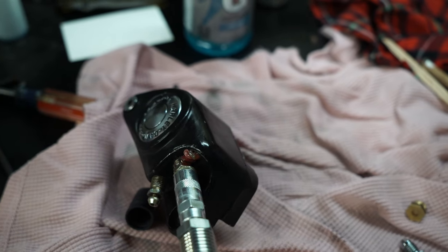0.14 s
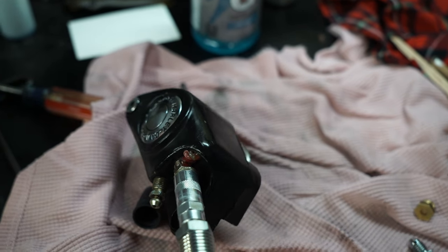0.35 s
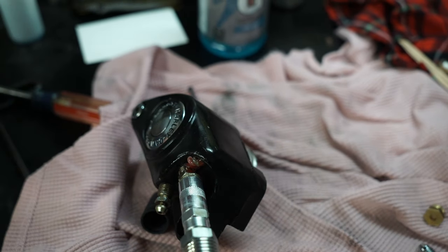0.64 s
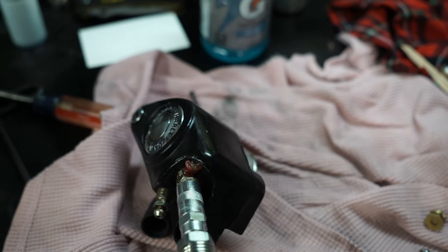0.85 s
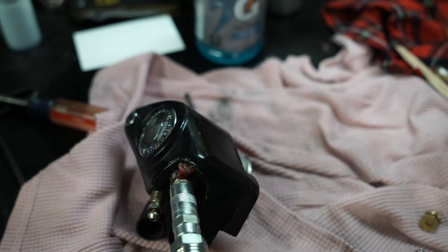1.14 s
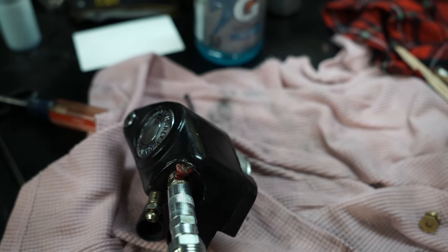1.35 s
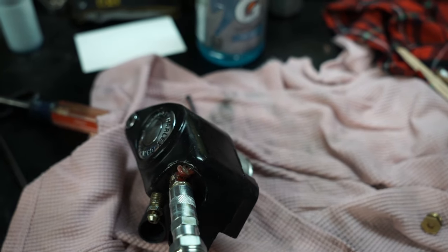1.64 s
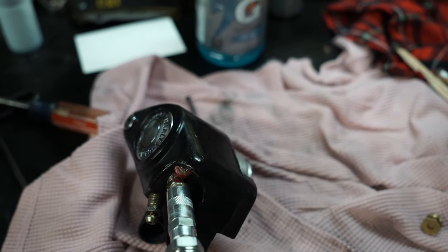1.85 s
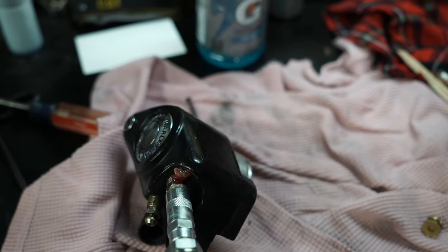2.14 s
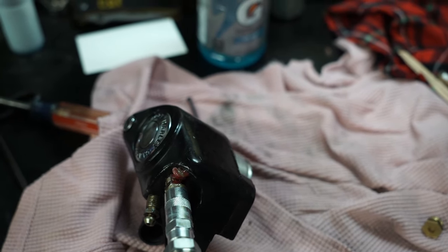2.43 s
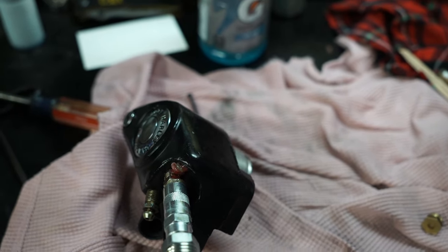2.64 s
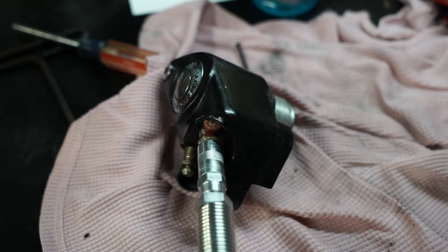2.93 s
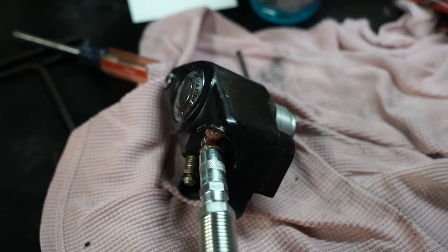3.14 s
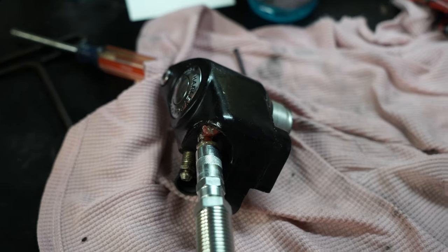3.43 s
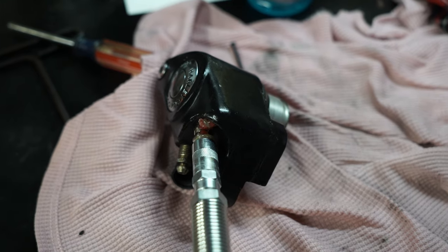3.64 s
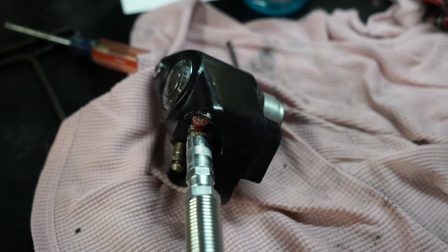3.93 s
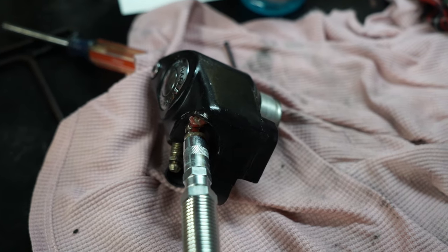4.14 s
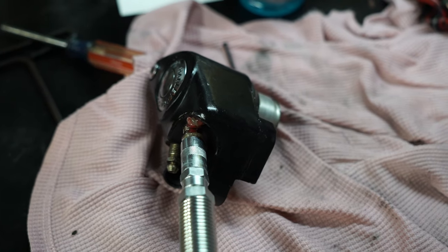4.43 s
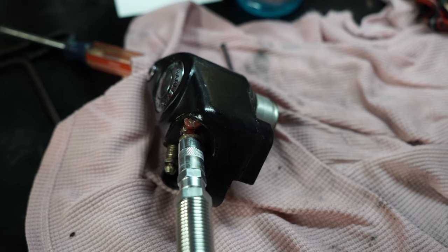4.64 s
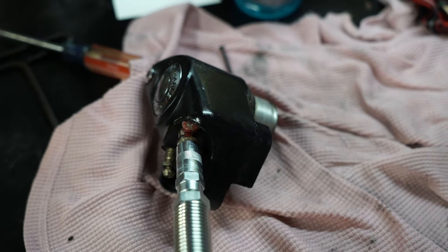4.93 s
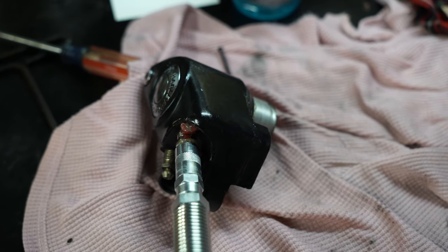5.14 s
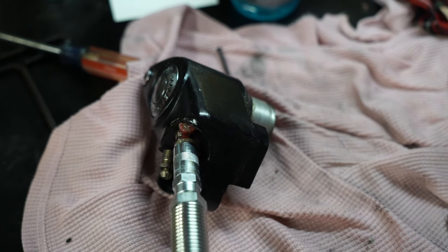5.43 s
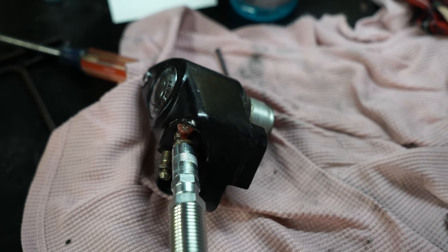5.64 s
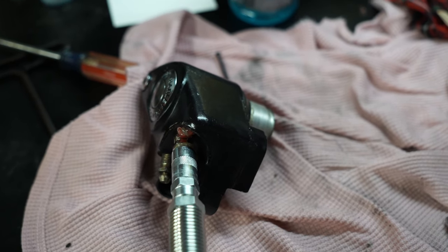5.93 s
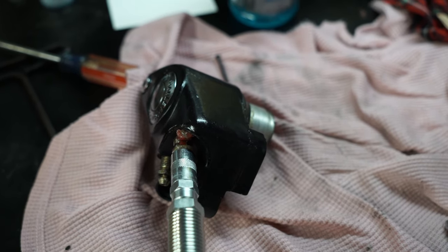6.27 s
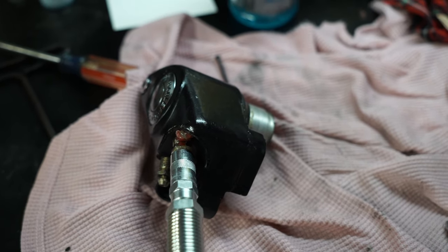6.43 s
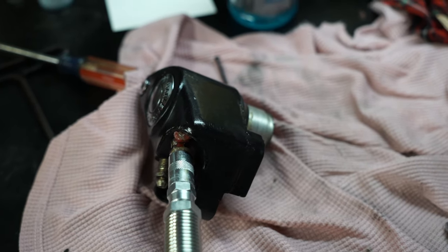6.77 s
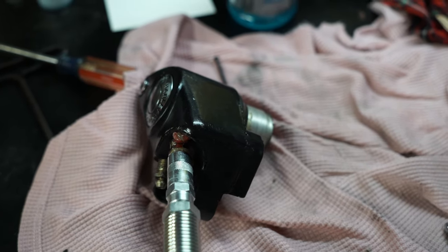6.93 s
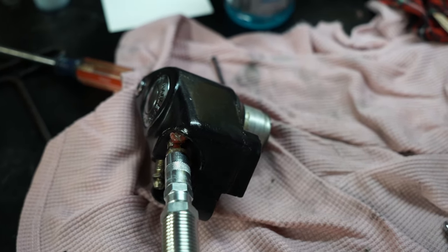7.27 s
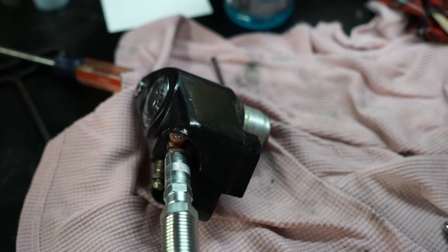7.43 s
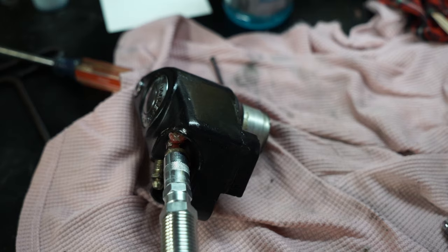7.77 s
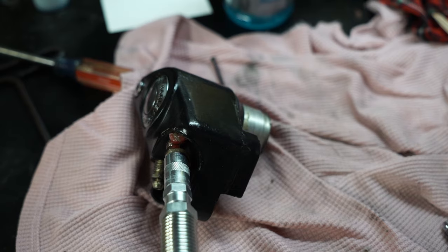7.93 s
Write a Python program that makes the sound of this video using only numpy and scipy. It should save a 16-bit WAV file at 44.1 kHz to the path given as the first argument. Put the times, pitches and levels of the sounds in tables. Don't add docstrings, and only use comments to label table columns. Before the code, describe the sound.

Close, bright stereo sound of a motorised grease pump on a bench. Loose gear clatter tightens into brief, harsh, sagging grinds at nearly half-second intervals, each released with a small knock, over an unchanging piercing tone. After nearly three seconds it stops for about half a second, with soft hum, trigger ticks and distant birds. A sharp click and jolt bring it back, revving up and pulsing steadily until the end.

```python
import sys
import numpy as np
from scipy import signal
from scipy.fft import rfft, irfft
from scipy.io import wavfile
from scipy.ndimage import uniform_filter1d

SR = 44100
rng = np.random.default_rng(int(sys.argv[2]) if len(sys.argv) > 2 else 0)


def wav_out(sig):
    wavfile.write(sys.argv[1], SR, np.round(np.clip(np.atleast_2d(sig).T, -1, 1) * 32767).astype(np.int16))


def gain_from_db(level_db):
    decades = np.asarray(level_db, float) / 20
    return 10 ** decades


N = 357210
T = np.arange(N) / SR
HZ = np.fft.rfftfreq(N, 1 / SR)
START_S = 3.274


def evened(x):
    return x / np.sqrt(np.mean(x ** 2) + 1e-20)


def read(points):
    f, value = np.transpose(points)
    return np.interp(np.log(HZ + 1), np.log(f + 1), value)


def over_time(points):
    return np.interp(T, *np.transpose(points))


def curve(tables, column, rest):
    out = np.full(N, float(rest))
    for rows in map(np.array, tables):
        inside = (T >= rows[0, 0]) & (T <= rows[-1, 0])
        out = np.where(inside, np.interp(T, rows[:, 0], rows[:, column]), out)
    return out


def wander(hz):
    steps = T[::30]
    lowpass = np.exp(-(np.fft.rfftfreq(len(steps), steps[1]) / hz) ** 2)
    slow = rfft(rng.standard_normal(len(steps))) * lowpass
    return np.interp(T, steps, evened(irfft(slow, len(steps))))


def room_hum(share):
    # (frequency [Hz], level [dB])
    room = [(18, -37), (30, -17.5), (75, -10), (124, -17), (165, -12.5), (355, -9.5), (499, -16),
            (616, -16), (913, -19.5), (6380, -27.5), (16000, -33)]
    noise = rfft(rng.standard_normal((3, N)))
    pair = np.sqrt(share) * noise[0] + np.sqrt(1 - share) * noise[1:]
    return evened(irfft(pair * gain_from_db(read(room)), N))


def birds():
    # (time [s], pitch [Hz], level [dB])
    phrases = [
        [(2.94, 6500, -80), (3.0, 6500, -68), (3.07, 6850, -66), (3.12, 6600, -74), (3.2, 6200, -76)],
        [(3.02, 3390, -75), (3.045, 3350, -59), (3.07, 3370, -67)],
        [(3.18, 4800, -79), (3.21, 4450, -68), (3.24, 4150, -74)],
    ]
    out = np.zeros(N)
    for rows in phrases:
        pitch = curve([rows], 1, 0) * (1 + .012 * wander(200))
        level_db = curve([rows], 2, -140) + 2.7 * wander(40)
        out += gain_from_db(level_db) * np.sin(2 * np.pi * np.cumsum(pitch) / SR)
    return out


def ticks():
    # (time [s], level [dB], centre [Hz], half width [Hz])
    tick_table = [
        (3.061, -51, 1200, 350),
        (3.0935, -50, 1400, 600),
        (3.0945, -52, 3200, 1500),
        (3.092, -45, 6900, 1900),
        (3.0935, -54, 12400, 3300),
        (3.269, -40, 2500, 1500),
        (3.269, -46, 5500, 3900),
        (3.312, -41, 420, 120),
        (3.33, -33.5, 742, 92.3),
    ]
    out, after = np.zeros(N), T[:8000]
    for s, db, hz, width in tick_table:
        shape = np.exp(-((np.fft.rfftfreq(len(after), 1 / SR) - hz) / width) ** 4)
        band = evened(irfft(rfft(rng.standard_normal(len(after))) * shape))
        ring = np.clip(after / 0.00089, 0, 1) * np.exp(-8 * np.sqrt(width) * after / 2)
        out[round(s * SR):][:len(after)] += gain_from_db(db) * band * ring
    return out


def trigger():
    stop_s, coast_db_per_s, ring_db, ring_db_per_s = 2.7, 420, -33, 133
    catch_s, catch_db = 0.076, -54
    surge_db, surge_s = 0.5, 2.2
    off, on = np.maximum(T - stop_s, 0), T - START_S
    catching_db = catch_db * np.clip(1 - on / catch_s, 0, 1) ** 2
    starting_db = catching_db + surge_db * np.exp(-abs(on) / surge_s)
    coasting_db = np.maximum(-coast_db_per_s * off, -120)
    ring = np.minimum(off / 0.014, 1) * gain_from_db(ring_db - ring_db_per_s * off)
    return np.where(on > 0, starting_db, coasting_db), ring


def shop_ring(ring):
    # (frequency [Hz], level [dB])
    shop = [(290, -40), (500, -8), (575, -8), (838, -7), (1380, -6), (1570, 1), (2740, -9), (4050, -4.5),
            (14000, -33)]
    spectrum = rfft(rng.standard_normal((3, N))) * gain_from_db(read(shop)) * (HZ > 400)
    return ring * evened(irfft(spectrum, N))


def whine(load):
    # (time [s], level [dB], left minus right [dB])
    whine_runs = [
        [(0.0, -34.5, -5.5), (0.6, -33, -7.5), (1.7, -33.5, -6.5), (2.61, -32.5, -7), (2.72, -52, -1)],
        [(3.268, -45, -3), (3.285, -36, -7), (3.33, -28, -21), (3.4, -28, -17), (3.48, -28.5, -38),
         (4.13, -33.5, -30), (4.55, -35, -23), (5.01, -34.5, -24), (5.48, -35, -17), (6.12, -35.5, -11.5),
         (7.44, -35, -16), (8.1, -35, -13)],
    ]
    # (time [s], frequency [Hz])
    switching = [(0, 3909.6), (2.7, 3909.6), (3.3, 3907.4), (8.1, 3906.6)]
    # (multiple of the tone [1], level [dB])
    overtones = [(2, -67), (3, -55), (4, -58)]
    turns = 2 * np.pi * np.cumsum(over_time(switching)) / SR
    dip_db = -2 * load
    level_db = curve(whine_runs, 1, -120) + 16.5 + dip_db + .7 * wander(40)
    gain = uniform_filter1d(gain_from_db(level_db), 150)
    narrow = (T > 3.275) * gain_from_db(-25 * np.maximum(T - 3.33, 0))
    upper = narrow * sum(gain_from_db(db) * np.sin(k * turns) for k, db in overtones)
    left = gain_from_db(curve(whine_runs, 2, 0)) * np.sin(turns + 2.75)
    return gain * np.array([left, np.sin(turns)]) + upper


def pump():
    # (time [s], length [s], push [dB])
    strokes = [(-.275, .15, 0), (0.21, 0.14, -2), (0.684, 0.16, -2.5), (1.158, 0.15, -1.5),
               (1.637, 0.15, -2.5), (2.114, 0.16, -2.9), (2.597, 0.089, -0.2), (3.807, 0.14, -1.5),
               (4.301, 0.14, -2.3), (4.779, .15, -2.5), (5.261, 0.14, -1.7), (5.733, 0.14, -2),
               (6.209, 0.14, -2), (6.686, 0.14, -1.5), (7.161, 0.15, -2), (7.64, 0.13, -2.5)]
    # (time [s], shaft speed [Hz])
    spin_up = [(3.28, 20), (3.35, 84), (3.6, 146), (3.72, 151), (3.81, 152)]
    # (time [s], speed factor [1])
    pace = [(0, 1.012), (2.7, 1.005), (3.81, .985), (4.3, .99), (4.78, 1), (8.1, .995)]
    # (time since stroke [s], level [dB])
    play = [(0, 2), (.03, -2.5), (.1, -6), (.15, -2.5), (.18, -3.5), (.22, -0.16), (.3, 1.74), (.4, -2.5),
            (.48, 1.34)]
    top_hz, low_hz = 173, 123
    sag_s, climb_s, turn_s, climb_bend = .125, .16, .48, .75
    bite_s = 0.0075
    start, length, push_db = np.transpose(strokes)
    last = np.searchsorted(start, T, "right") - 1
    since = T - start[last]
    freed = since - length[last]
    load = np.clip(since / 0.012, 0, 1) * np.clip((0.041 - freed) / 0.055, 0, 1)
    sagging = (1 + np.cos(np.pi * np.minimum(since / sag_s, 1) ** .92)) / 2
    climbing = np.clip((since - climb_s) / (turn_s - climb_s), 0, 1) ** climb_bend
    shaft = (low_hz + (top_hz - low_hz) * (sagging + climbing)) * over_time(pace)
    spinning_up = (T > 2.9) & (T < start[7])
    shaft = np.where(spinning_up, over_time(spin_up), shaft)
    bite = sum(np.exp(-((T - s) / bite_s) ** 2) for s in start)
    return freed, load, gain_from_db(push_db[last]), np.interp(since, *np.transpose(play)), bite, shaft


def housing(x, points):
    # (frequency [Hz], width [Hz], gain [dB])
    modes = [(1303, 52, 4), (1525, 66, 1.5), (1740, 296, 5), (2034, 42, 5), (2244, 80, 11),
             (2500, 141, 11.5), (3302, 64, 5.5), (3480, 31, 6.5), (3790, 30, 0.5), (4750, 120, 5.5),
             (4200, 300, 2), (5170, 440, 4), (6700, 30, 7.5), (7500, 100, 1.5), (8300, 40, 0.5),
             (9100, 120, 4), (10100, 100, -2.5)]
    ring_db = sum(db / (1 + (2 * (HZ - hz) / width) ** 2) for hz, width, db in modes)
    return irfft(rfft(x) * gain_from_db(read(points) + ring_db), N)


def grit(points, per_s, spread_db):
    hits = (rng.random((3, N)) < per_s / SR) * rng.standard_normal((3, N))
    return evened(housing(hits * gain_from_db(spread_db * wander(300)), points))


def gear_rumble(level_db, load):
    # (frequency [Hz], level [dB])
    rumble = [(50, -49), (110, -26), (200, -9), (400, 0), (560, -1), (720, 2.5), (900, -15.5),
              (1100, -24.5)]
    return gain_from_db(-42.5 - 6 * load + .65 * level_db) * grit(rumble, 3000, 0.54)


def gear_fizz(level_db, play_db):
    # (frequency [Hz], level [dB])
    fizz = [(3500, -32), (5000, -5.5), (6500, 5), (9000, 3), (12000, 2), (14000, 0), (15000, -0.5),
            (15800, 0)]
    lag_db = -5 * (T > START_S) * np.exp(-abs(T - START_S - 0.076) / 0.11)
    gain_db = -30.5 + 1.18 * level_db + lag_db + 0.66 * play_db + 1.7 * wander(4)
    return gain_from_db(gain_db) * grit(fizz, 16000, 0.77)


def gear_rattle(level_db, play_db, bite, load):
    # (frequency [Hz], level [dB])
    rattle = [(600, -18.5), (850, -2), (1000, 7), (1300, 11), (2000, 9), (2800, 10.5), (3800, 14),
              (4300, 7.5), (6000, 1), (8000, -26)]
    mesh_db = .5 * play_db + bite + load
    uneven_db = 0.73 * wander(42) + 0.26 * wander(10.7)
    return gain_from_db(-22.5 + level_db + mesh_db + uneven_db) * grit(rattle, 9000, 1.02)


def gear_grind(freed, load, push, running):
    # (frequency [Hz], level [dB])
    grind = [(2300, -17.5), (2900, 3.5), (3300, 14), (4400, 9), (6000, 6.5), (8000, 4.5), (10400, 2.5),
             (11300, -7.5), (13500, -6.5), (15500, -4)]
    sag = gain_from_db(-20 * np.clip(freed + 0.16, 0, .15))
    return gain_from_db(-18.5) * load * push * sag * running * grit(grind, 15000, 0.77)


def tooth_orders(freed, load, push, shaft):
    orders = [1, 4.95, 12, 13, 26, 30, 39]
    # (running free [dB], under load [dB], loss per decade of slower running [dB])
    order_levels = [(-47.5, -61, 40), (-55, -52.5, 30), (-24.5, -48, 230), (-65, -32, 30), (-52, -19, 30),
                    (-46, -62, 60), (-64, -30.5, 30)]
    # (frequency [Hz], level [dB])
    tooth_spectrum = [(110, -24), (140, -9), (172, 0), (615, 6), (680, -5), (1600, 4), (1780, 2),
                      (1900, -11), (2080, -5.5), (2250, -1), (3300, -1), (3800, 1), (4450, -5), (5700, 2),
                      (6300, -12)]
    turns = 2 * np.pi * np.cumsum(shaft) / SR
    bearing = load * push * np.clip((.01 - freed) / 0.044, .15, 1)
    teeth = np.zeros(N)
    for k, (free_db, load_db, slow_db) in zip(orders, order_levels):
        swell_db = slow_db * np.log10(shaft / 170) * (1 - load) + 1.8 * wander(60)
        gain = gain_from_db(swell_db) * ((1 - load) ** 3 * gain_from_db(free_db) + bearing * gain_from_db(load_db))
        teeth += gain * np.sin(k * turns + (.35 + k / 50) * wander(45))
    return housing(teeth, tooth_spectrum)


def plunger_knock(freed, running):
    after = np.maximum(freed - .025, 0) * (running > .5)
    low = gain_from_db(-55 - 60 * after / .3) * np.sin(2 * np.pi * 76 * after)
    high = gain_from_db(-30.5 - 60 * after / 0.029) * np.sin(2 * np.pi * 1050 * after)
    return low + high


def echoed(x):
    return np.array([x, np.roll(x, 170), np.roll(x, 290)])


def ports(x, share, reach=1):
    # (frequency [Hz], lead [rad])
    lead = [(900, 0), (2100, .4), (2900, -1.5), (3800, -3.1), (5200, -5.0), (6500, -5.9), (8500, -6.4),
            (10000, -6.9), (12000, -5.4), (15000, -6.2)]
    # (frequency [Hz], left minus right [dB])
    balance = [(450, 0), (700, -1.5), (1300, -4.5), (2000, -6), (2350, -4), (2520, -10), (2900, -5),
               (4400, -2), (8100, -4), (14000, -7)]
    lean, z = read(balance) / 2, rfft(x)
    direct = np.sqrt(share) * np.array([np.exp(1j * reach * read(lead)), HZ ** 0])
    both = direct * z[0] + np.sqrt(1 - share) * z[1:]
    return irfft(both * gain_from_db(np.array([lean, -lean])), N)


def scene():
    # (frequency [Hz], share of direct sound [1])
    direct_share = [(40, .92), (130, .996), (450, .996), (800, .8), (1500, .55), (2500, .7), (3200, .3),
                    (5300, .65), (8000, .35), (12000, .25), (15500, .5)]
    share = read(direct_share)
    near, reach = np.maximum(share, .92), np.interp(HZ, [4200, 4900], [.7, 1])
    freed, load, push, play_db, bite, shaft = pump()
    level_db, ring = trigger()
    running = np.clip(gain_from_db(level_db), 0, 1)
    working = load * running

    duck_db = 17 * working + running * (2 + 5.5 * wander(6))
    hum = gain_from_db(-57.0 - duck_db) * room_hum(share)
    small = ports(echoed(birds() + ticks()), near)
    noisy = shop_ring(ring) + gear_rumble(level_db, load) + gear_fizz(level_db, play_db)
    noisy = noisy + gear_rattle(level_db, play_db, bite, load) + gear_grind(freed, load, push, running)
    clear = running * tooth_orders(freed, load, push, shaft) + plunger_knock(freed, running)
    return hum + small + whine(working) + ports(noisy, share) + ports(echoed(clear), near, reach)


def top_cut(x):
    return signal.sosfilt(signal.butter(12, 16400, fs=SR, output="sos"), x)


def record(dry):
    change_s, edge_hz = 2.927, 15860
    fade = np.clip(abs(T - change_s) / .005, .15, 1)
    limited = dry / (1 + (dry / .72) ** 8) ** (1 / 8) * fade
    band = (HZ < edge_hz) * HZ / np.hypot(HZ, 40)
    return top_cut(irfft(rfft(limited) * band, N))


dry = scene()
out = record(dry)
wav_out(out)
```